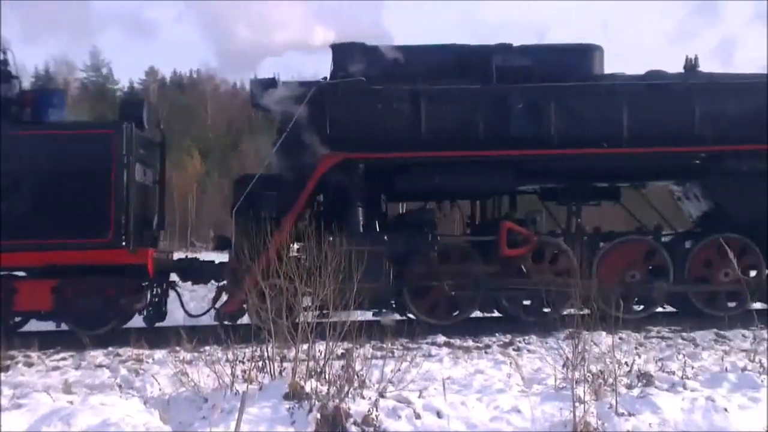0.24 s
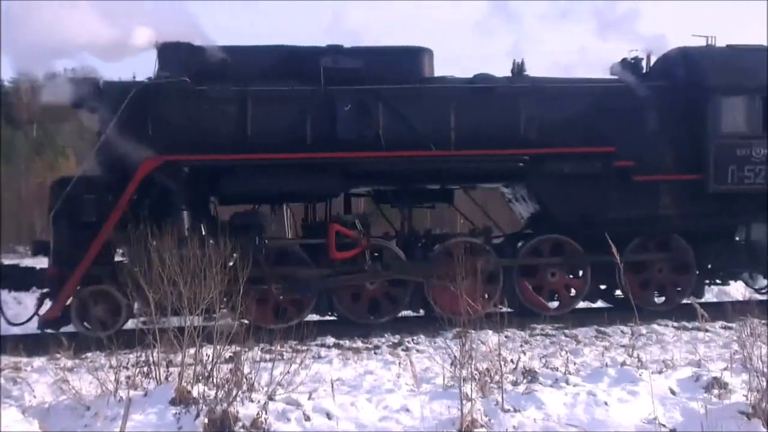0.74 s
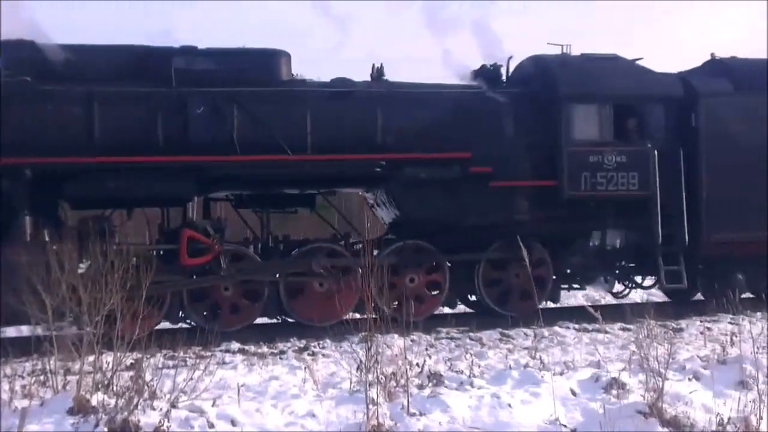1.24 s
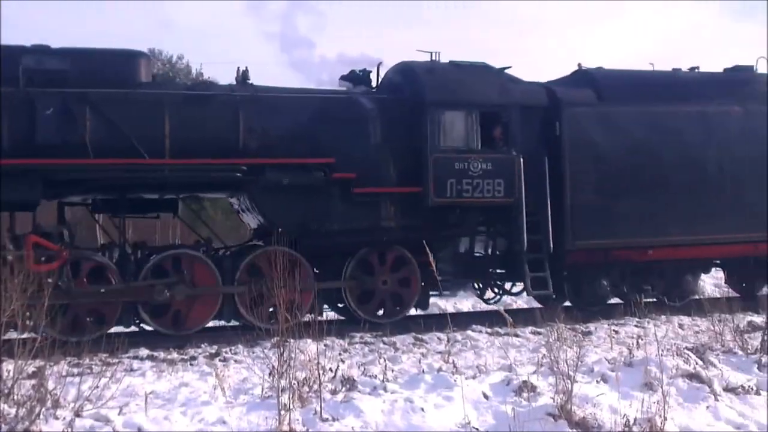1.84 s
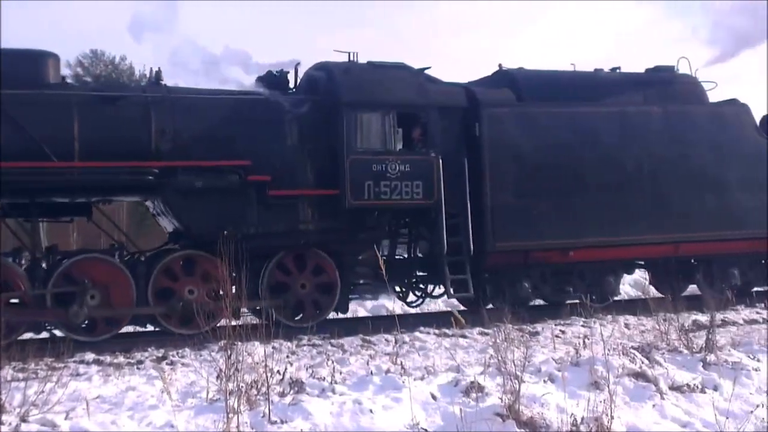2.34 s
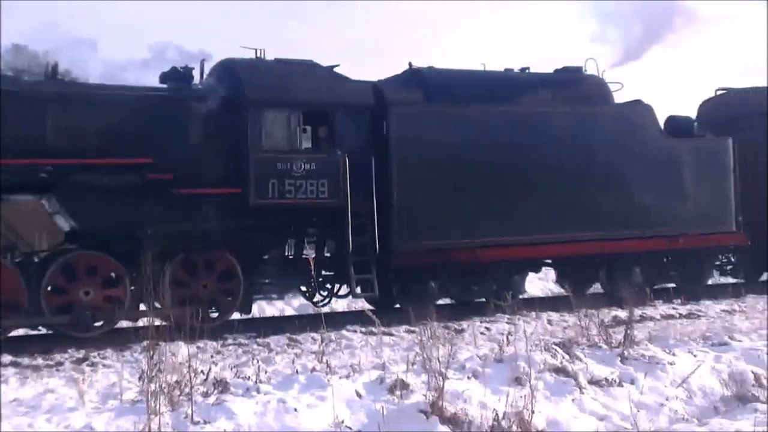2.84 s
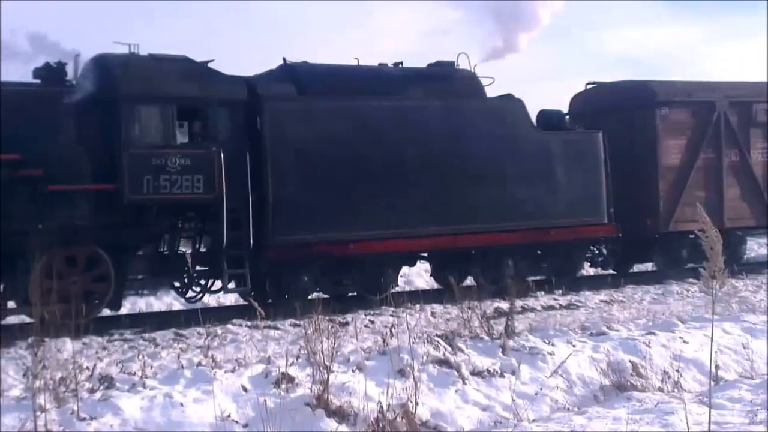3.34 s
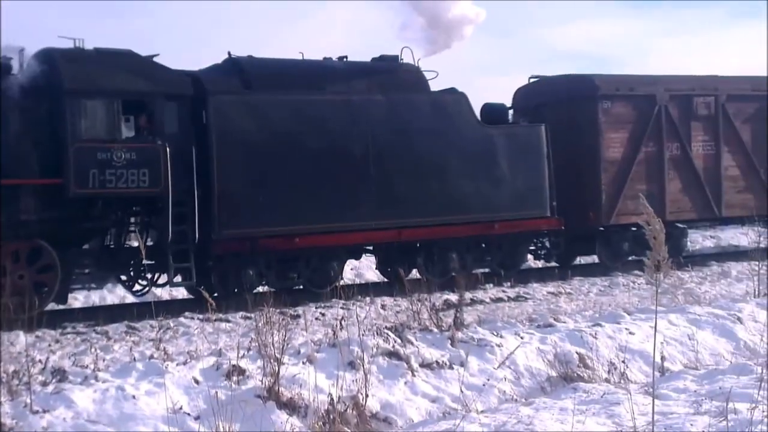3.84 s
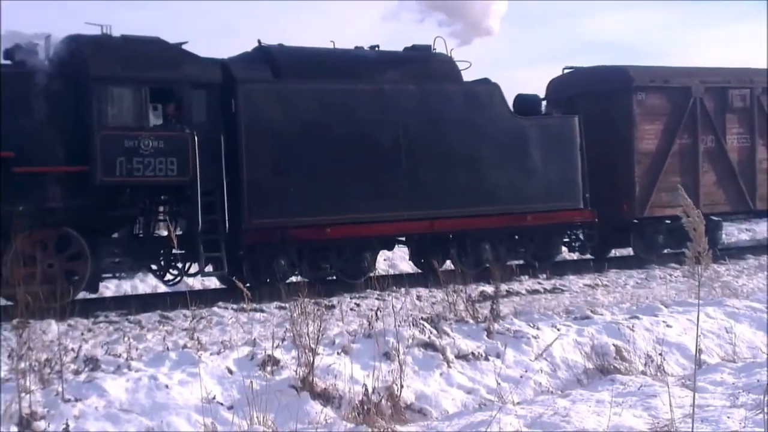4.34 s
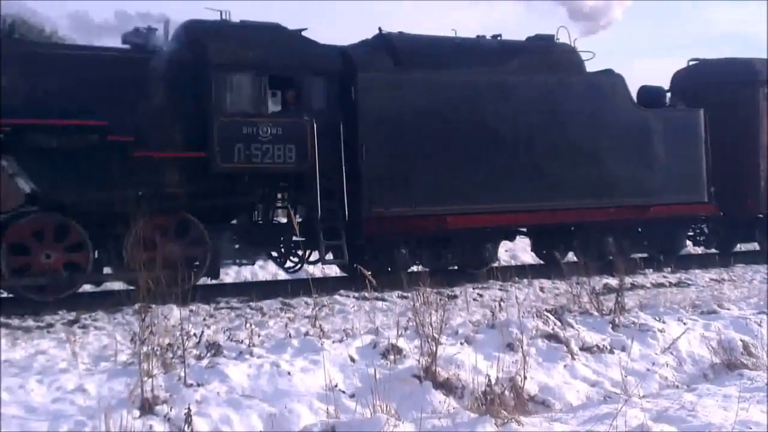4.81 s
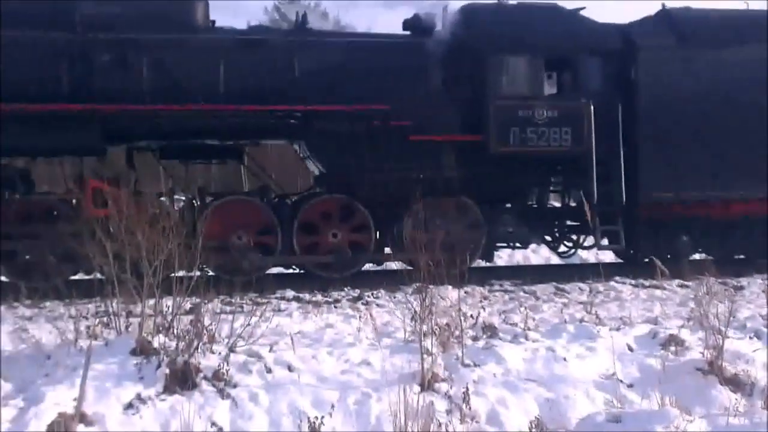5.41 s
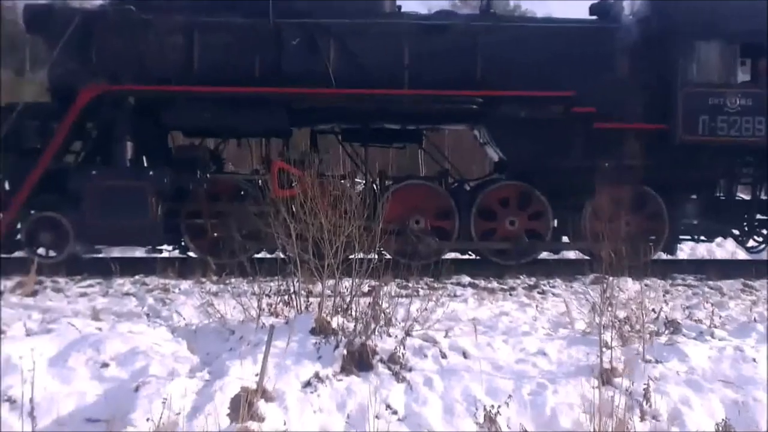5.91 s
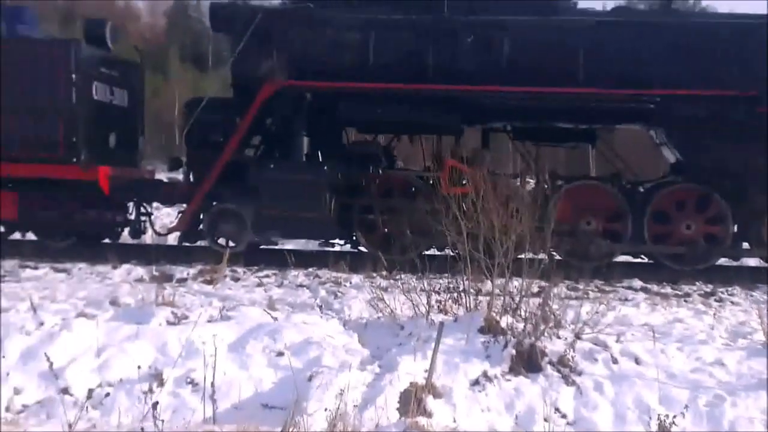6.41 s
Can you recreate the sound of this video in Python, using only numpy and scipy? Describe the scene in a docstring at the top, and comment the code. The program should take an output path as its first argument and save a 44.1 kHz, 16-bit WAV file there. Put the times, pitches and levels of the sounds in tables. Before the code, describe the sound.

Dense bright steam hiss and ragged puffs from slow passing steam engines, over thin wheel rumble, buzzing turbine, clanking rods and brief faint squeaks.

```python
"""Steam locomotives roll slowly past. From the start, wheels rumble and steam hisses as filtered noise,
leaks sound as wandering narrow bands, the chimney beats about once a second with quicker puffs between,
and a turbo-generator buzzes as shaft knocks ring its casing. Soon rods knock and ring, and faint thumps
follow; after two seconds steel squeaks as brief wavering tones. A small camera's microphone pair with
weak bass hears it all: its body adds moving dips and peaks, and its stereo widener echoes the side signal."""
import sys
import numpy as np
from scipy import signal
from scipy.io import wavfile

SR = 44100
rng = np.random.default_rng(int(sys.argv[2]) if len(sys.argv) > 2 else 0)


def store_wav(level_fs):
    """Save 16-bit WAV to argv[1]."""
    pcm = np.round(np.clip(np.atleast_2d(level_fs), -1, 1) * 32767)
    wavfile.write(sys.argv[1], SR, pcm.T.astype(np.int16))


N = 293706
STEP = 64  # samples between slow control values
TICKS = np.arange(N // STEP + 2) * STEP / SR  # control times [s]

# steady sound of the train: (time [s], deep rumble [dB], rolling [dB], cylinder steam [dB],
# valve steam [dB], fine jet [dB], left-minus-right pan [dB])
TRAIN = [(0.0, -34.5, -30.5, -25.5, -24.5, -24.5, -1), (0.18, -31.5, -34, -24, -32, -36, -3),
         (0.39, -35.5, -35.5, -21, -26.5, -24.5, -0.5), (0.65, -38, -35, -20, -25.5, -24.5, -1.5),
         (0.96, -35.5, -37, -20, -31, -26, -2), (1.3, -39.5, -38.5, -23, -27.5, -28, -2.5),
         (1.72, -41.5, -36, -22, -31, -26.5, -1), (2.39, -43, -38.5, -24, -51, -28.5, 0),
         (2.71, -42.5, -39.5, -23.5, -31, -27, -0.5), (3.19, -47, -41, -26.5, -31.5, -33, -0.5),
         (3.56, -46, -44, -28, -30, -33.5, 0), (3.76, -43.5, -41, -25, -28.5, -22, -0.5),
         (3.95, -47, -42, -25.5, -27, -39, -2.5), (4.38, -43.5, -47, -26.5, -31.5, -35.5, -1),
         (4.67, -44.5, -52, -30, -28, -30, -2), (4.88, -43, -40, -25.5, -40, -35.5, -1.5),
         (5.14, -40.5, -36, -23, -28, -28, -3.5), (5.34, -46, -38, -20, -23.5, -22, -4),
         (5.49, -44, -34, -19.5, -23, -22.5, -3.5), (5.99, -44, -37, -22, -22, -24.5, -4),
         (6.4, -44, -36.5, -21, -26, -28.5, -3), (6.66, -43, -35, -22, -24, -24.5, -4)]
# relative spectral densities of valve steam and of the fine jet: (frequency [Hz], density [dB per Hz])
VALVE_COLOUR = [(4500, 0.5), (5600, -2.5), (6500, 3), (7200, 4), (8000, -31), (9500, -4.5)]
JET_COLOUR = [(5000, -10.5), (8000, 3), (9200, -4), (10000, -1), (11300, -10.5), (12700, -10), (14300, -20),
              (15000, -16), (16000, -27)]
# chimney beats: (time [s], peak level [dB])
BEATS = [(.03, -36), (.825, -26), (1.81, -28.5), (2.76, -34.5), (3.72, -30.5), (4.625, -34), (5.54, -32),
         (6.46, -26)]
BEAT_RISE_S = .013


def from_db(db):
    """Decibels to amplitude gain; twice the decibels give the power ratio."""
    return 10 ** (np.asarray(db) / 20)


def rms_one(x):
    """Normalise the mean power to 1."""
    return x / np.sqrt(np.mean(x ** 2) + 1e-20)


def at_hz(points, hz):
    """Interpolate a spectrum on logarithmic frequency; beyond its ends it keeps its end value."""
    return np.interp(np.log(hz), np.log(np.array(points)[:, 0]), np.array(points)[:, 1])


def share(points, hz, width):
    """Power share of one band: its density times width over the integrated spectrum, zero outside it."""
    low, high = points[0][0], points[-1][0]
    grid = np.geomspace(low, high, num=200)
    total = np.sum(from_db(2 * at_hz(points, grid)) * np.gradient(grid))
    return from_db(2 * at_hz(points, hz)) * width / total * (low <= hz <= high)


def drift(rate):
    """Slow random fluctuation of rms 1: white noise through two equal one-poles at rate [Hz]."""
    r = np.exp(-2 * np.pi * rate * STEP / SR)
    settling = 1000
    noise = rng.standard_normal(len(TICKS) + settling)
    return rms_one(signal.lfilter([1], [1, -2 * r, r * r], noise)[settling:])


def swells(rows, t, rise, fall):
    """Summed power of bursts (time [s], peak [dB]) with Gaussian rise and fall [s]."""
    s, db = np.transpose(rows)[:, :, None]
    shape = np.exp(-((t - s) / np.where(t < s, rise, fall)) ** 2)
    return np.sum(from_db(2 * db) * shape, axis=0)


def panned(db):
    """Left and right gains that split a level difference evenly."""
    return from_db(np.array([db / 2, -db / 2]))


def poles(hz, width):
    """Denominator of a two-pole resonance: the bandwidth [Hz] sets its damping."""
    r = np.exp(-np.pi * width / SR)
    return np.array([1, -2 * r * np.cos(2 * np.pi * hz / SR), r * r])


def resonate(x, hz, width):
    """Damped resonance with unit gain at its peak."""
    a = poles(hz, width)
    return signal.lfilter(np.array([1, 0, -1]) * (1 - a[2]) / 2, a, x, axis=-1)


def steady_train():
    """Broadband sources: rolling contact and turbulent steam as (power, colour) pairs."""
    # relative spectral densities of the sources: (frequency [Hz], density [dB per Hz])
    rail_colour = [(90, -61), (160, -38), (250, -21), (420, -12.5), (700, 0.5), (1000, -3.5), (1500, -46)]
    rolling_colour = [(700, -15), (850, -5), (1100, 4.5), (1300, 1), (1500, -3)]
    cylinder_colour = [(1500, -60), (2000, -10.5), (2400, -6), (2800, -1.5), (3600, -2.5), (4300, -5.5),
                       (5200, -11), (6500, -17)]
    upper_roll_colour = [(1250, -13.5), (1450, -0.5), (1800, 1), (2050, -2.5), (2400, -52)]
    # upper rolling hiss: (time [s], level [dB])
    upper_roll_level = [(0.0, -32), (0.2, -31.5), (0.48, -34), (1.26, -39.5), (1.52, -40), (2.06, -34.5),
                        (2.37, -39), (2.69, -35.5), (2.95, -36), (3.04, -35.5), (3.71, -36), (3.86, -34),
                        (3.97, -33), (4.41, -39.5), (4.75, -35.5), (4.99, -34), (5.57, -35), (5.73, -35.5),
                        (6.31, -46), (6.66, -38)]
    # brief dips and rises of the steady sound: (time [s], change at the centre [dB])
    level_changes = [(.19, -4.5), (2.36, -3.5), (3.22, -2.5), (3.65, -1.5), (4.0, 0.5), (4.3, 1.5),
                     (3.57, -2.5), (4.47, -1.5), (5.03, -2.5), (5.44, -0.5), (5.68, 0), (5.82, -2.5),
                     (6.2, 0), (6.36, -3), (6.49, -2)]
    change_s = 0.029
    change_db = sum(db * np.exp(-((TICKS - t) / change_s) ** 2) for t, db in level_changes)
    s, *levels, _ = np.transpose(TRAIN)
    levels_db = [np.interp(TICKS, s, db) for db in levels]
    levels_db.append(np.interp(TICKS, *np.transpose(upper_roll_level)))
    powers = [from_db(2 * (db + change_db)) for db in levels_db]
    colours = [rail_colour, rolling_colour, cylinder_colour, VALVE_COLOUR, JET_COLOUR, upper_roll_colour]
    return list(zip(powers, colours))


def chimney_beats():
    """Pulsed exhaust: each beat is a noise burst with a shorter hollow bark at its start."""
    # relative spectral densities of beat and bark: (frequency [Hz], density [dB per Hz])
    beat_colour = [(300, -35), (520, -7.5), (700, -2), (880, 2), (1100, 3.5), (1400, -4.5), (1700, -0.5),
                   (2500, 1), (6000, -24), (12000, -26)]
    bark_colour = [(660, -8.5), (760, -8), (880, -1), (980, -5)]
    beat_fall_s, bark_fall_s = .08, .05
    bark_db, ragged_db = -2, 1.5  # bark relative to beat; rms flicker of the beat
    beat = swells(BEATS, TICKS, BEAT_RISE_S, beat_fall_s) * from_db(2 * ragged_db * drift(59.0))
    bark = from_db(2 * bark_db) * swells(BEATS, TICKS, BEAT_RISE_S, bark_fall_s)
    return [(bark, bark_colour), (beat, beat_colour)]


def steam_puffs():
    """Transient jets: each puff has a body and a bright hiss under one Gaussian swell."""
    # puffs: (time [s], body peak [dB], bright hiss peak [dB], length: rise plus fall constant [s])
    puffs = np.array([(0.087, -42, -20, 0.039), (0.151, -19.5, -21.5, 0.039), (0.225, -18, -22, 0.043),
                      (0.403, -15, -18, 0.015), (0.755, -26.5, -23, 0.045), (0.89, -40, -23, 0.091),
                      (1.362, -25, -39, 0.16), (1.442, -33, -40, 0.025), (1.527, -23.5, -29, 0.024),
                      (1.595, -26, -21.5, 0.067), (1.736, -42, -22.5, 0.018), (1.788, -18.5, -40, 0.02),
                      (1.98, -41, -24, 0.071), (2.443, -21.5, -21.5, 0.076), (2.59, -26, -40, 0.021),
                      (2.715, -19, -32, 0.024), (2.815, -21, -36, 0.09), (3.27, -25, -30.5, 0.048),
                      (3.738, -19, -19, .03), (3.707, -21.5, -26, 0.028), (3.901, -23.5, -29, 0.069),
                      (4.031, -38, -32.5, 0.048), (4.169, -23.5, -37, 0.088), (4.55, -22.5, -43, 0.046),
                      (4.633, -22, -31.5, 0.034), (4.725, -21.5, -34.5, 0.2), (5.193, -26, -24, 0.055),
                      (5.289, -42, -31, 0.053), (5.565, -24, -23.5, 0.13), (5.86, -24.5, -21, 0.021),
                      (6.147, -38, -22, 0.2), (6.432, -42, -26, 0.027), (6.527, -42, -34, 0.024)])
    # relative spectral density of the body: (frequency [Hz], density [dB per Hz])
    body_colour = [(400, -17), (800, 0.5), (1500, 5), (2600, 12.5), (3600, 10.5), (4500, 9), (6500, -3),
                   (9500, -18), (15000, -51)]
    rise_share = 0.41  # part of the length spent swelling
    valve_db = -5.5  # valve colour relative to jet colour
    length = puffs[:, 3:]
    rise, fall = rise_share * length, (1 - rise_share) * length
    body = swells(puffs[:, [0, 1]], TICKS, rise, fall)
    bright = swells(puffs[:, [0, 2]], TICKS, rise, fall)
    return [(body, body_colour), (bright * from_db(2 * valve_db), VALVE_COLOUR), (bright, JET_COLOUR)]


def steam_and_wheels(gust_db, patch_db, flicker_db):
    """Power addition of incoherent sources: each noise band carries the sum of all their powers."""
    # likeness of the two sides: (frequency [Hz], correlation)
    likeness = [(100, .95), (250, 0.97), (640, 0.64), (1000, 0.46), (1500, 0.52), (2300, 0.7), (4000, 0.45),
                (7000, 0.41), (15000, 0.22)]
    # lean of the microphone ports: (frequency [Hz], left-minus-right level [dB])
    lean = [(110, 0), (200, 4), (380, -0.5), (700, -3), (1290, -4), (1950, -5.5), (2400, -1), (3200, 1),
            (4400, -7.5), (6800, -2.5), (8300, 4), (11000, 2), (15000, 0)]
    sources = steady_train() + chimney_beats() + steam_puffs()
    train = np.array(TRAIN)
    pan = np.interp(TICKS, train[:, 0], train[:, -1]) - np.mean(train[:, -1])
    edges = np.r_[np.geomspace(90, 500, num=6), np.geomspace(500, 16000, num=36)[1:]]
    white = rng.standard_normal((2, 2, N))
    gust, patch = drift(23.0), drift(9.9)
    out, at = np.zeros((2, N)), np.arange(N) / SR
    for k, (low, high) in enumerate(zip(edges, edges[1:])):
        hz, width = np.sqrt(low * high), high - low
        band = signal.butter(2, [low, high], "band", fs=SR, output="sos")
        mid, side = signal.sosfilt(band, white[k % 2])
        power = sum(p * share(colour, hz, width) for p, colour in sources)
        patch = .8 * patch + .6 * drift(7.)  # neighbouring bands swell partly together
        tilt = -1 + 900 / max(hz, 500)  # patchiness vanishes at 900 Hz and changes sign there
        wobble_db = gust_db * gust + patch_db * tilt * patch + flicker_db * drift(14.8)
        gain = np.sqrt(power * SR / 2 / width) * from_db(wobble_db)
        alike = np.clip(at_hz(likeness, hz), -.95, .98)
        pair = np.sqrt((1 + alike) / 2) * mid + np.sqrt((1 - alike) / 2) * side * [[1], [-1]]
        ears = gain * panned(pan * min(1, hz / 600) + at_hz(lean, hz))
        out += pair * [np.interp(at, TICKS, g) for g in ears]
    return out


def leak(rows, width, alike, pan_db, flicker_db):
    """Quadrature modulation: low-passed noise is carried along a wandering centre frequency."""
    s, hz, db = np.transpose(rows)
    at = np.arange(N) / SR
    low_pass = signal.butter(2, width / 2, fs=SR, output="sos")
    slow = signal.sosfilt(low_pass, rng.standard_normal((4, N)))
    phase = 2 * np.pi * np.cumsum(np.interp(at, s, hz)) / SR
    mid, side = slow[:2] * np.cos(phase) + slow[2:] * np.sin(phase)
    alike = np.clip(alike, 0, 1)
    pair = rms_one(np.sqrt(1 + alike) * mid + np.sqrt(1 - alike) * side * [[1], [-1]])
    level_db = np.interp(at, s, db) + flicker_db * np.interp(at, TICKS, drift(31.0))
    return pair * from_db(level_db) * panned(pan_db)[:, None]


def wandering_leaks():
    """Narrow-band turbulence: three leaks hiss in bands that wander as the engines move."""
    # each leak: (time [s], centre frequency [Hz], level before flicker [dB])
    high_leak = [(0, 3750, -26), (.5, 3600, -30.5), (.9, 3400, -28), (1.2, 3364, -25.5), (1.4, 3735, -27.5),
                 (1.9, 3414, -36), (2.4, 3293, -34), (3.5, 3305, -37), (4.4, 3330, -40), (5.1, 3400, -33),
                 (5.18, 3454, -23.5), (5.35, 3485, -23.5), (5.5, 3700, -25), (5.75, 3790, -24),
                 (5.97, 3750, -24.5), (6.07, 3480, -29), (6.3, 3620, -28), (6.45, 3530, -29.5),
                 (6.66, 3610, -27)]
    low_leak = [(0, 2550, -25), (.6, 2500, -39), (1.5, 2400, -35.5), (2.3, 2350, -38), (3.3, 2400, -36),
                (4, 2400, -31), (4.7, 2380, -36), (5.25, 2420, -43), (5.33, 2450, -29), (5.7, 2470, -29),
                (5.95, 2480, -32), (6.3, 2530, -25), (6.66, 2570, -29)]
    top_leak = [(0, 7440, -28), (.6, 6740, -36), (3, 6790, -41), (3.9, 6500, -31), (4.8, 6806, -39),
                (5.2, 6670, -44), (5.5, 6500, -31), (5.8, 6840, -26.5), (6.15, 7000, -25),
                (6.35, 6820, -34), (6.66, 6800, -37)]
    # widths in Hz
    high = leak(high_leak, width=380, alike=.6, pan_db=-1.5, flicker_db=2.1)
    low = leak(low_leak, width=340, alike=0.62, pan_db=-1.5, flicker_db=1.3)
    top = leak(top_leak, width=700., alike=0.49, pan_db=-3.5, flicker_db=2.5)
    return high + low + top


def whistles(per_s, width, under_db):
    """Gated resonance: brief noise rings at 16 pitches at random times, following the cylinder steam level."""
    s, steam_db = np.transpose(TRAIN)[[0, 3]]
    out, soft = np.zeros((2, N)), np.hanning(600)
    ticks = N // STEP + 1
    for hz in np.geomspace(2300, 4600, num=16):
        started = rng.random(ticks) < per_s * STEP / SR / 16
        starts = started * rng.random(ticks)  # random strengths
        gate = signal.oaconvolve(np.repeat(starts, STEP)[:N], soft)[:N]
        rung = resonate(gate * rng.standard_normal(N) + 1e-18, hz, width)
        out += rung * panned(rng.normal(0, 2.6))[:, None] / np.sqrt(hz)
    return rms_one(out) * from_db(np.interp(np.arange(N) / SR, s, steam_db) + under_db)


def turbo(uneven_db, rattle, shade_db):
    """Periodic excitation of modes: one knock per shaft turn, with a decaying rattle, rings the casing."""
    # generator: (time [s], relative level [dB])
    turbo_level = [(0, -29.5), (.6, -34), (1.1, -34.5), (1.4, -31.5), (1.9, -33), (2.3, -32.5),
                   (2.7, -32.5), (3.1, -34.5), (3.6, -36), (4, -30.5), (4.3, -33.5), (4.6, -35.5),
                   (5.1, -34), (5.4, -29), (5.9, -32), (6.66, -31)]
    # shaft: (time [s], speed [turns per s])
    shaft = [(0, 57.95), (3, 58.09), (4.3, 58.22), (6.66, 58.2)]
    # casing: (frequency [Hz], width of each of two passes [Hz], gain [dB], left-minus-right pan [dB])
    casing = [(873, 22, -14, -6), (966, 39, -44, 3), (1318, 50, -7.5, -11), (1526, 76, -4.5, 2),
              (1795, 89, -4.5, -8), (2167, 29, 1.5, 6), (2371, 144, 4, -9.5), (2475, 80, -0.5, 6),
              (2840, 80, -7, 10), (3085, 58, -1, 8), (3277, 105, -7.5, -15)]
    first_turn = .36  # part of a turn done at the start
    boiler_echo, echo_s = 0.33, .00415
    stagger_s = .0032  # each part of the casing is struck this much after the last
    at = np.arange(N) / SR
    speed = np.interp(at, *np.transpose(shaft))
    turns = first_turn + np.cumsum(speed) / SR
    knocks = np.diff(np.floor(turns), prepend=0) * from_db(uneven_db * rng.standard_normal(N))
    drive = knocks + rattle * np.exp(-(turns % 1) / 0.56) * rng.standard_normal(N)
    drive = drive + boiler_echo * np.roll(drive, round(echo_s * SR))  # the boiler side throws it back
    drive = drive * from_db(np.interp(at, TICKS, 1.5 * drift(6.)) - 5.5)  # gusts of steam shade it
    drive = drive * from_db(np.interp(at, *np.transpose(turbo_level))) * SR / speed / 2
    out = np.zeros((2, N))
    for k, (hz, width, db, pan) in enumerate(casing):
        struck = np.roll(drive, round(k * stagger_s * SR))
        rung = resonate(resonate(struck, hz, width), hz, width)
        gain = from_db(db + shade_db * np.interp(at, TICKS, drift(6.6)))
        out += (-1) ** k * gain * rung * panned(pan)[:, None]
    return out


def rods(pan_db):
    """Modal ringing: short noise bursts, knocks in the bearings, excite the steel rods."""
    # knocks: (time [s], peak level of the exciting burst [dB])
    bearing_knocks = [(.15, -32), (1.44, -42), (3.735, -27), (3.89, -37), (4.1, -38), (4.37, -44),
                      (4.42, -40.5), (4.49, -47)]
    # modes of the rods: (frequency [Hz], width [Hz], level [dB])
    modes = [(720, 350, -22), (1090, 81, -19), (1246, 130, 4), (1554, 56, 8), (1810, 110, 2.5),
             (2470, 140, 5), (2030, 450, -6.5), (2870, 400, -7), (5900, 370, 3)]
    rise_s, fall_s = 0.007, 0.015
    power = swells(bearing_knocks, TICKS, rise_s, fall_s)
    level = np.sqrt(np.interp(np.arange(N) / SR, TICKS, power) + 1e-18)
    burst = rng.standard_normal(N) * level
    rung = sum(from_db(db) * np.sqrt(SR / np.pi / width) * resonate(burst, hz, width)
               for hz, width, db in modes)
    no_bass = signal.butter(4, 520, "high", fs=SR, output="sos")  # the weak-bass microphones hear no low end of the rods
    return signal.sosfilt(no_bass, rung) * panned(pan_db)[:, None]


def thumps():
    """Structure-borne sound: dull low noise bursts over a fainter murmur, alike on both sides."""
    # thumps through the camera body: (time [s], peak level [dB])
    bumps = [(.41, -77), (.99, -81), (1.26, -84), (1.43, -86), (3.9, -89), (4.13, -86), (4.42, -85),
             (4.64, -81), (4.79, -81), (5.17, -77), (5.63, -74), (6.53, -81)]
    thump_s, top_hz, murmur_db = 0.026, 110, -100
    power = swells(bumps, TICKS, thump_s, thump_s) + from_db(2 * murmur_db)
    band = signal.butter(2, [25, top_hz], "band", fs=SR, output="sos")
    low = signal.sosfilt(band, rng.standard_normal(N))
    return rms_one(low) * np.sqrt(np.interp(np.arange(N) / SR, TICKS, power))


def squeak():
    """Frictional tones: rubbing steel gives brief sinusoids of randomly wavering frequency."""
    # squeaks: (time [s], mean frequency [Hz], relative level [dB], length [s])
    rubs = [(2.437, 3390, -21, 0.019), (2.458, 3030, -22, 0.023), (2.595, 3150, -19, 0.012),
            (2.637, 3530, -25, .015), (2.65, 4300, -31, 0.011), (2.656, 6130, -30, 0.035),
            (2.724, 3100, -27, 0.017), (2.712, 6140, -18.5, 0.02), (2.72, 4400, -24, 0.018),
            (2.782, 3120, -21, .018), (2.83, 3770, -26, 0.037), (2.813, 3040, -28, .02),
            (2.846, 3380, -28, .012), (2.978, 3310, -25, .015), (3.258, 3400, -24, 0.023)]
    waver_hz = 25  # rms
    at = np.arange(N) / SR
    waver = np.cumsum(waver_hz * np.interp(at, TICKS, drift(25.))) / SR
    out = np.zeros(N)
    for (s, hz, db, length), phase in zip(rubs, rng.random(len(rubs))):
        near = slice(round((s - .1) * SR), round((s + .1) * SR))
        level = np.sqrt(2 * swells([(s, db)], at[near], length / 2, length / 2))
        out[near] += level * np.sin(2 * np.pi * (hz * at[near] + waver[near] + phase))
    return out


def swung(x, size=256):
    """Time-varying filtering: gliding resonances are partly removed or added, block by block."""
    # swing of the camera: (time [s], turn [0 along the track to 1 facing the engine],
    # strength of the body's colouring [0-1])
    swing = [(0, 1., 0.9), (.4, 0.76, 0.5), (.85, 0.3, 0.7), (1.5, 0.24, 1), (2.1, 0.17, 0.45),
             (2.7, 0.19, 0.6), (3.3, 0.18, 0.3), (3.7, 0.065, 0), (4.1, 0.041, 0.1), (4.8, 0.15, 0.51),
             (5.15, 0.11, 0.16), (5.4, 0.34, 0.84), (5.7, 0.28, 1), (6.1, 0.56, 0.7), (6.35, 0.41, 0.9),
             (6.66, 1, 0.8)]
    # dips and peaks of the camera body:
    # (frequency at turn 0 [Hz], frequency at turn 1 [Hz], width [Hz], gain at full strength [dB])
    body_modes = [(2720, 3110, 304, -10), (3710, 5980, 105, -17), (10750, 10200, 1500, -3.5),
                  (2230, 2760, 195, 3), (3020, 4000, 135, 2), (3580, 3910, 120, 2), (6000, 6900, 650, 0),
                  (1240, 7900, 690, 1.5)]
    s, turn, strength = np.transpose(swing)
    starts = np.arange(0, N, size)
    turn, strength = np.interp(starts / SR, s, turn), np.interp(starts / SR, s, strength)
    for along_hz, facing_hz, width, db in body_modes:
        state, parts = np.zeros((2, 2)), []
        centres = along_hz + (facing_hz - along_hz) * turn
        for i, centre, keep in zip(starts, centres, from_db(db * strength)):
            a, block = poles(centre, width), x[:, i:i + size]
            b = np.array([1, 0, -1]) * (1 - a[2]) / 2
            rung, state = signal.lfilter(b, a, block, zi=state)
            parts.append(block + (keep - 1) * rung)
        x = np.hstack(parts)
    return x


def scene():
    """Superposition of the airborne sources at the two ports."""
    noise = steam_and_wheels(gust_db=0.5, patch_db=0.13, flicker_db=1.76)
    leaks = wandering_leaks() + whistles(per_s=150., width=25, under_db=-13)
    generator = turbo(uneven_db=-2.5, rattle=0.02, shade_db=1.5)
    squeaks = from_db(-1.5) * squeak()  # half hidden by the hiss
    return noise + leaks + generator + rods(pan_db=-2.0) + squeaks


def record(dry):
    """Transduction chain: resonant ports, side-signal echo, soft saturation, thumps and band limits."""
    # port resonances: (frequency [Hz], width [Hz], left gain [dB], right gain [dB])
    ports = [(1366, 200, -2.5, 5), (2425, 380, -0.5, -4), (3700, 310, -3, 2), (4310, 320, -1, 2.5),
             (5350, 1300, 1.5, -4), (6360, 200, -10, 2), (7340, 3400, -2, 0.5), (9470, 810, 4.5, 3)]
    # all-pass of the right port, which turns the phase a full circle: (frequency [Hz], width [Hz])
    right_lag = (1300, 545)
    widen_s, widen_share = .002007, .6
    bass_cut_hz, cutoff_hz = 170, 15500
    heard = swung(dry)
    for hz, width, *ear_db in ports:
        heard = heard + (from_db(ear_db)[:, None] - 1) * resonate(heard, hz, width)
    lag = poles(*right_lag)
    heard[1] = signal.lfilter(lag[::-1], lag, heard[1])
    at = np.arange(N)
    side = (heard[0] - heard[1]) / 2
    echo = widen_share * np.interp(at - widen_s * SR, at, side, left=0)
    rounded = 2.2 * np.tanh((heard + echo * [[1], [-1]]) / 2.2)
    bass_cut = signal.butter(4, bass_cut_hz, "high", fs=SR, output="sos")
    thin = signal.sosfilt(bass_cut, rounded) + thumps()
    return signal.sosfilt(signal.ellip(14, .5, 100, cutoff_hz, fs=SR, output="sos"), thin)


dry = scene()
out = record(dry)
store_wav(out)
```